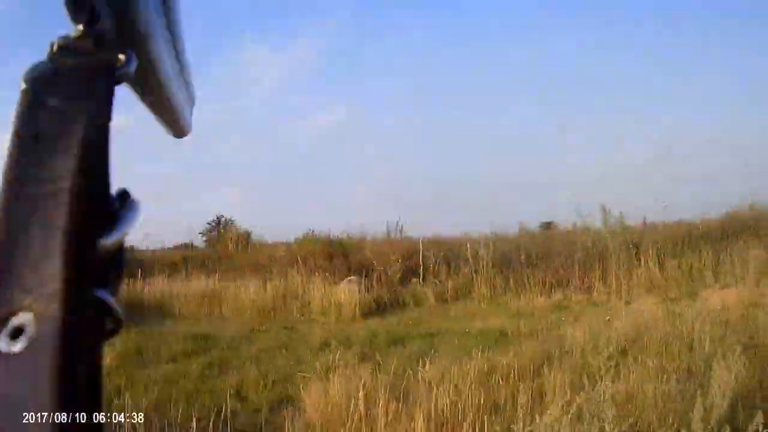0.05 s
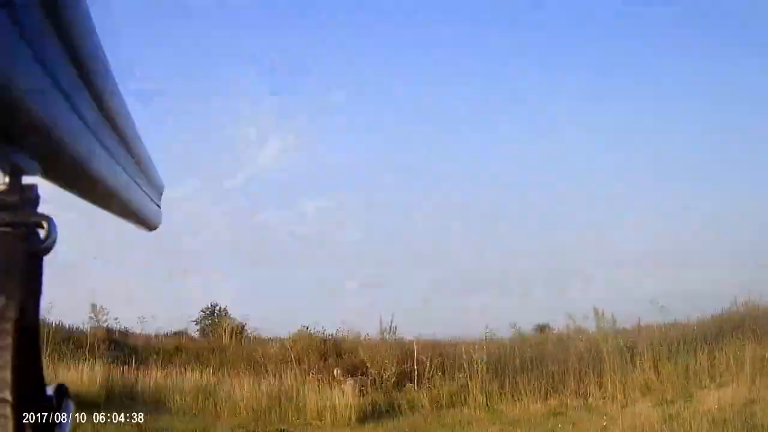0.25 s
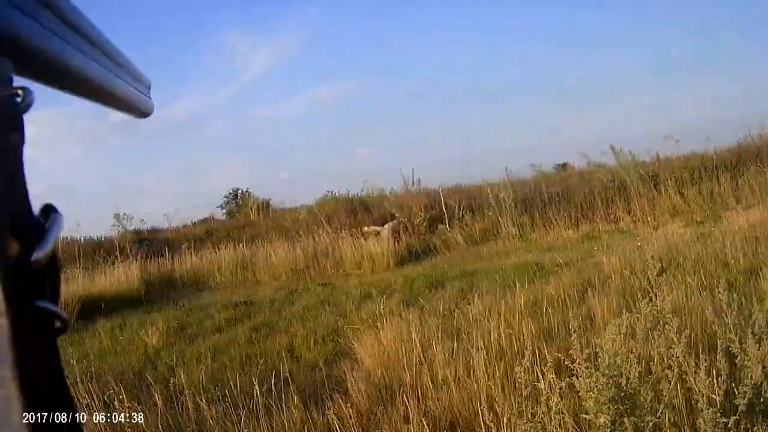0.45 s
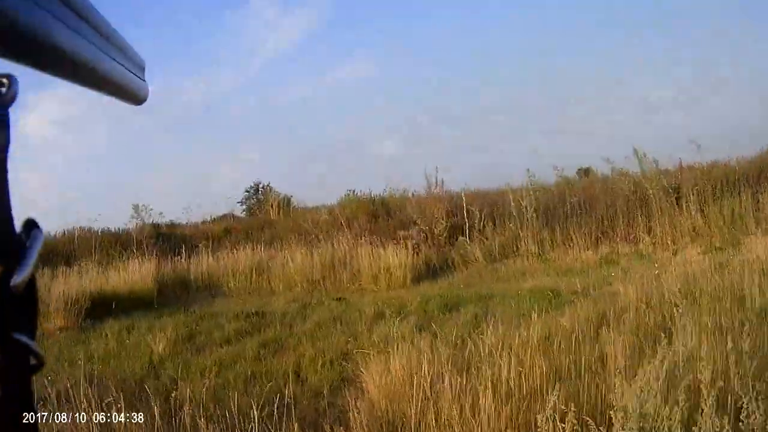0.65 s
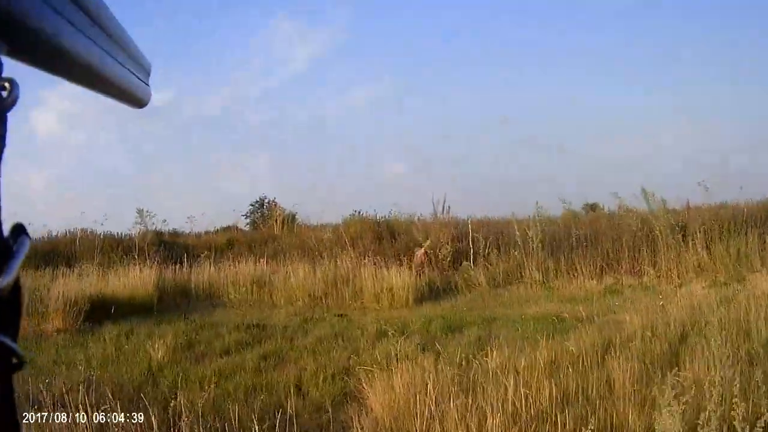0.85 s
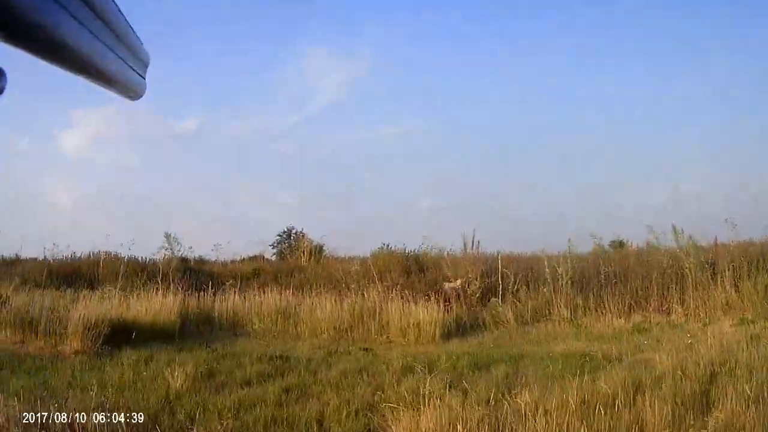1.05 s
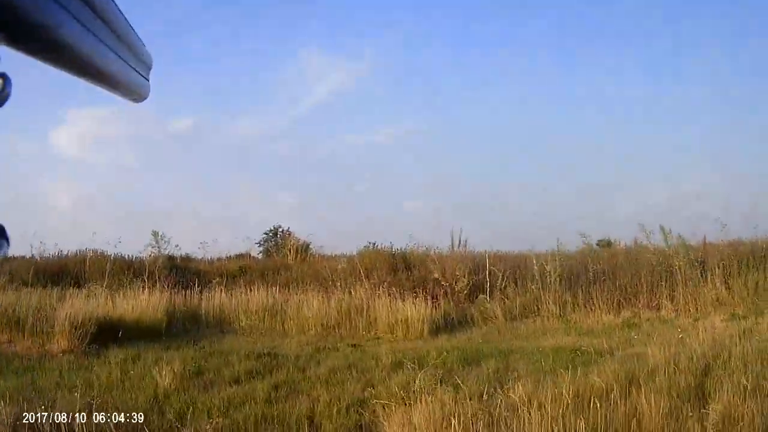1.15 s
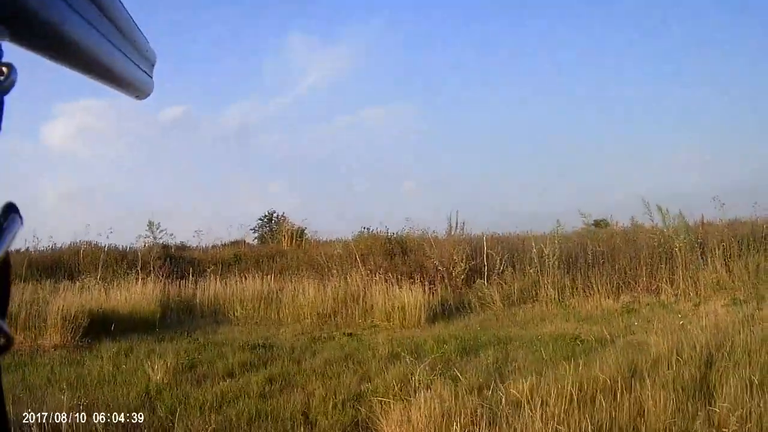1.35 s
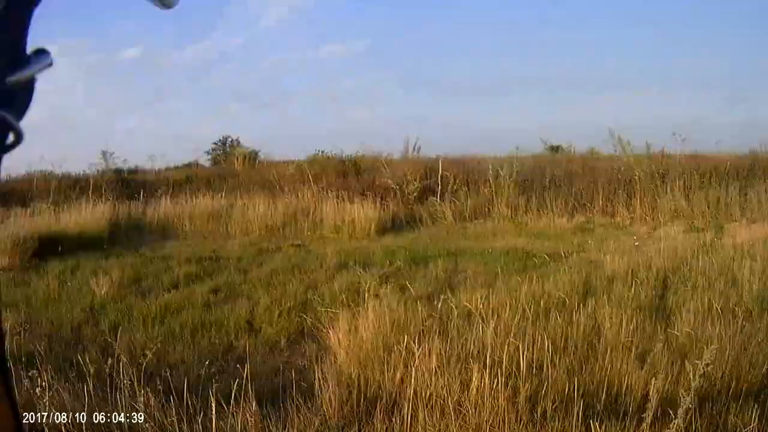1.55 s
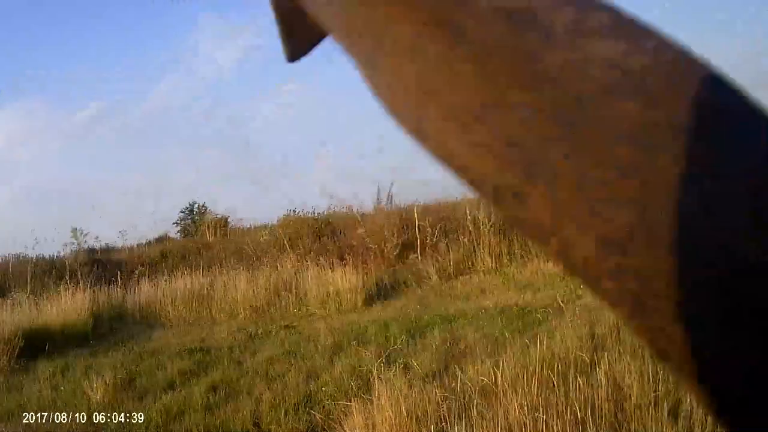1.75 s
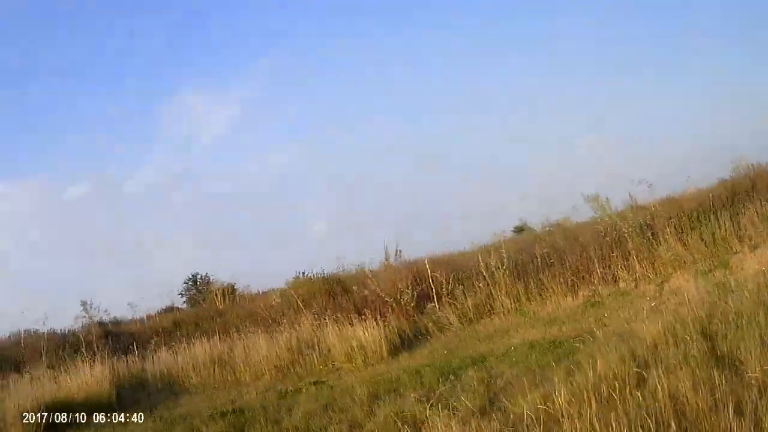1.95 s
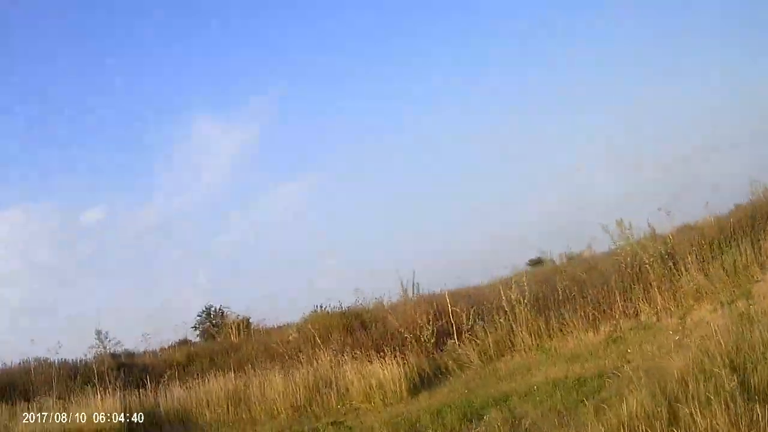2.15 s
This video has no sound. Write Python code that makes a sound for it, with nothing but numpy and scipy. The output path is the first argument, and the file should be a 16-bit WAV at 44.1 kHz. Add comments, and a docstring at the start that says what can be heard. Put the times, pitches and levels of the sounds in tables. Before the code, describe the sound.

Gear knocks and rubs against a body-worn microphone, with faint dry grass rustling outdoors.

```python
"""A faint brush of fabric, then gear knocks twice on the case of a body-worn camera as someone shifts
a gun in dry grass. Each impact excites the damped modes of the case. A sling and clothing slide over it
in short strokes of friction noise, catching and bumping. Stalks rustle and snap in light wind,
a sum of many tiny impulses, above a low rumble of moving air."""
import sys
import numpy as np
from scipy import signal
from scipy.fft import rfft, irfft, next_fast_len
from scipy.io import wavfile
from scipy.ndimage import map_coordinates

SR = 44100
rng = np.random.default_rng(int(sys.argv[2]) if len(sys.argv) > 2 else 0)


def generate_wav(sig):
    """Save sig (samples, or channels by samples) to the path in sys.argv[1] as 16-bit PCM at SR."""
    pcm = np.round(np.clip(np.atleast_2d(sig).T, -1, 1) * 32767).astype(np.int16)
    wavfile.write(sys.argv[1], SR, pcm)


N = 97020
T = np.arange(N) / SR
HIT_T = T[:SR // 10]  # time axis of one impact

# spectrum of far wind in the field: frequency_hz, gain_db
FAR_WIND_SPECTRUM = [(59, -44), (100, 0.5), (328, -3.5), (1330, 0.5), (2750, -11.5), (4870, -8),
                     (6840, -15), (10900, -18), (12900, -13.5), (16000, -32)]
# envelope of the rumble of air and movement: time_s, level_db
RUMBLE_ENVELOPE = [(0, -63.5), (.2, -78), (.25, -52), (.35, -64), (.44, -45), (.51, -62), (.6, -44.5),
                   (.68, -51.5), (.76, -70), (.95, -72), (1.07, -59.5), (1.2, -65.5), (1.46, -61),
                   (1.54, -50.5), (1.66, -54.5), (1.8, -53.5), (1.94, -64), (2.02, -72), (2.2, -60)]
# spectrum of that rumble: frequency_hz, gain_db
RUMBLE_SPECTRUM = [(15, 0.5), (35, -2.5), (70, -7), (150, -12), (280, -12.5), (500, -32), (1200, -64),
                   (4000, -90)]
# envelope of folding clothes: time_s, level_db
FOLD_ENVELOPE = [(.2, -97), (.28, -47), (.35, -67), (.44, -50.5), (.5, -71), (1.35, -74), (1.5, -50),
                 (1.55, -43.5), (1.62, -52.5), (1.76, -53), (1.88, -87), (1.94, -51), (2.0, -70)]
# spectrum of the muffled folds: frequency_hz, gain_db
FOLD_SPECTRUM = [(40, 5.5), (130, 2), (300, -3), (600, -10.5), (1200, -13.5), (4000, -30.5)]
# envelope of rustling grass: time_s, level_db
GRASS_ENVELOPE = [(0.7, -56.5), (0.74, -66), (0.754, -55.5), (0.764, -60.5), (0.908, -53), (0.958, -62),
                  (1.006, -55), (1.38, -72)]
# spectrum of stalks brushing together: frequency_hz, gain_db
BRUSH_SPECTRUM = [(120, -24), (300, -10.5), (850, -3.5), (1200, 5), (1550, 0.5), (2000, -7), (2800, -13.5),
                  (4200, -11.5), (5100, -13.5), (6800, -17), (10800, -23.5), (13200, -14), (16000, -29)]
# single stalks snapping: start_s, level_db, pitch_hz, ring_gain_db
STALK_SNAPS = [(0.0414, -30, 5940, -8), (0.904, -32, 5800, -7), (.935, -41, 7940, -8),
               (1.0353, -38, 5200, -4), (1.04, -39, 5000, 6), (1.063, -43, 5200, 3),
               (1.092, -39.5, 7900, -2), (1.131, -32.5, 5970, -10.5), (1.142, -33.5, 5000, -10),
               (1.205, -37, 12100, -4), (1.262, -37.5, 12400, -8.5), (1.459, -32.5, 10800, -12)]
# spectrum of a breaking stalk: frequency_hz, gain_db
SNAP_SPECTRUM = [(500, -5), (1400, -1), (2700, -13), (4000, -6.5), (5200, 4), (6600, -8), (8000, -4),
                 (10500, -11), (13000, -14), (16000, -32)]
# thin squeaks of fabric: start_s, level_db, t60_s
FABRIC_SQUEAKS = [(2.1677, -48, .03), (2.1766, -47, 0.069)]
# spectrum of a squeak: frequency_hz, gain_db
SQUEAK_SPECTRUM = [(11500, -34.5), (12700, -3), (13300, -5), (14100, -14), (15500, -24)]
# sliding strokes: start_s, length_s, level_db, change_db, tilt_db_per_octave, contact_hz, contact_db
SLIDING_STROKES = [(0, 0.041, -63.5, -2, 5, 6100, 9), (0.038, 0.066, -52.5, -3, 1.5, 6100, -1),
                   (0.1, 0.034, -46, 2.5, 2, 6230, 0.5), (0.157, 0.037, -54.5, -6, 2.5, 6000, 4),
                   (0.234, 0.074, -46.5, -7, -1, 4850, 6), (0.352, 0.019, -48, 8, 0.5, 3930, -5),
                   (0.3745, 0.064, -38.5, -7, 0.45, 426, 16.5), (.44, 0.031, -44.5, 1.5, -2.6, 3880, -1.5),
                   (0.603, 0.038, -47, 1, -0.2, 990, 13.5), (0.639, 0.054, -46, -15.5, -1.6, 3740, 2),
                   (1.397, 0.012, -54.5, 14, -4, 1870, 6), (1.499, 0.043, -48.5, 4, -0.7, 4800, 5),
                   (1.521, 0.037, -44, 1, -1, 8360, 6.5), (1.576, 0.024, -46.5, -9.5, -2, 835, 10),
                   (1.762, 0.014, -43, -11, -1.5, 1930, 12.5), (1.884, 0.025, -49.5, -3.5, -1.6, 2030, 9),
                   (1.961, 0.023, -50.5, -10, -0.5, 2040, 8), (2.004, 0.048, -53, -3, -2.2, 850, 11),
                   (2.102, 0.049, -48.5, -1.5, 0, 7400, 10.5), (2.148, 0.034, -55.5, 4.5, 0.5, 7000, 3)]
# spectrum of rubbing heard through the case: frequency_hz, gain_db
RUB_SPECTRUM = [(100, -2.5), (280, -10.5), (450, 5.5), (700, -2), (1000, 5), (1700, 0), (2150, 2),
                (2800, -7), (3400, 1.5), (3850, 6), (4300, -1.5), (4750, 4), (5400, -2.5), (6200, 0.5),
                (7300, -8.5), (8400, -3), (10500, -7), (13000, -13), (16000, -18)]
# low thumps on the case, from slips and under the second knock: release_s, level_db, loading_s
CASE_THUMPS = [(0.3149, -25, 0.00046), (0.475, -26, 0.00077), (0.5694, -25.5, 0.00043),
               (0.5736, -30.5, 0.0015), (0.5952, -21.5, 0.00076), (0.5999, -24.5, 0.0014),
               (0.6397, -17.5, 0.00042), (0.7507, -44.5, 0.00063), (1.075, -38, 0.0006),
               (1.205, -42.5, 0.0011), (1.533, -33.5, 0.0025), (1.54, -31.5, 0.0032),
               (1.689, -38.5, 0.0026), (1.949, -39.5, 0.0012)]
# soft pushes against the case: centre_s, level_db, half_width_s
SOFT_PUSHES = [(0.272, -34.5, 0.0034), (.545, -45, 0.032), (0.664, -32.5, 0.0081), (1.587, -39, 0.012),
               (1.619, -37.5, 0.011), (1.833, -39, 0.011)]
# light taps of the sling's hardware: start_s, level_db, pitch_hz, t60_s
HARDWARE_TAPS = [(.4020, -34, 970, 0.0072), (.4310, -19.5, 1420, 0.0033), (0.6384, -15, 936, 0.0078),
                 (0.6956, -42, 783, 0.045), (0.7507, -39.5, 943, 0.039), (1.4503, -27, 1270, 0.0072),
                 (1.458, -34.5, 1470, 0.0052), (1.5490, -26.5, 756, 0.012), (1.595, -39, 930, 0.021),
                 (1.808, -42.5, 1560, 0.006), (1.832, -43, 480, 0.016)]
# modes of a tap: pitch_ratio, gain_db
HARDWARE_MODES = [(.55, -3), (.83, 0), (1.18, 0), (1.5, -15.5)]
# modes of the case: frequency_hz, gain_db, t60_s
CASE_MODES = [(294, -27.5, 0.018), (441, 4, 0.029), (524, 1, 0.013), (791, -4.5, 0.028),
              (1044, -11.5, 0.022), (1117, -10.5, 0.015), (1236, -4.5, 0.018), (1430, 0, 0.018),
              (1740, -1.5, 0.0075), (2290, -9.5, 0.018), (3270, -13.5, 0.0076), (3770, -11.5, 0.011),
              (4300, -10.5, 0.0077), (6830, -13, 0.008)]
# spectrum of the crack at contact: frequency_hz, gain_db
CRACK_SPECTRUM = [(150, -35.5), (400, 5), (1000, 2), (2600, -15.5), (4000, 0), (5300, -12.5), (6500, -4),
                  (9500, -25.5), (13000, -25.5), (16000, -41)]
# knocks, tuned by the pressure on the case: start_s, level_db, corner_hz, mid_db, crack_db, pitch_ratio
GEAR_KNOCKS = [(0.2283, -3.5, 9050, 3, 0, 0.99), (0.2322, -4, 9000, -6, -6, 0.95),
               (0.316, -22.5, 1800, -9.5, -11, 1.13), (0.3772, -14.5, 6040, -20, -15, 0.95),
               (0.4407, -16.5, 4000, -28, -3.5, 0.85), (0.4584, -13.5, 2200, -12, -27, 1),
               (0.6376, -10.5, 7000, -18, 2, 1.04), (0.6452, -21, 6040, -8.5, -5, 1.11),
               (1.5587, -22.5, 1490, -7, -19, 0.996)]


def amp(db):
    """Amplitude ratio of a level in decibels."""
    return 10 ** (np.asarray(db) / 20)


def add(track, start_s, sound):
    """Superposition: a sound joins the track at start_s."""
    part = track[max(0, round(start_s * SR)):][:len(sound)]
    part += sound[:len(part)]


def coloured(x, spectrum, tilt=0, pivot_hz=4000):
    """Spectral shaping: x through a gain curve tilted in dB per octave, scaled to rms 1."""
    size = next_fast_len(len(x) + len(HIT_T))
    octave = np.log2(np.fft.rfftfreq(size, 1 / SR) + 1)
    hz, db = np.transpose(spectrum)
    tilt_db = tilt * (np.maximum(octave, np.log2(hz[0])) - np.log2(pivot_hz))
    gain = amp(np.interp(octave, np.log2(hz), db) + tilt_db)
    shaped = irfft(rfft(x, size) * gain, size)[:len(x)]
    return shaped / np.sqrt(np.mean(shaped ** 2) + 1e-20)


def grains(per_s, spread_db):
    """Shot noise: independent tiny impacts of uneven size."""
    impulses = (rng.random(N) < per_s / SR) * rng.choice([-1, 1], N)
    return impulses * amp(spread_db * np.clip(rng.standard_normal(N), -2, 2))


def wander(positions):
    """Smooth random variation: a spline through one Gaussian value per unit of position."""
    return map_coordinates(rng.standard_normal(size=200), [positions], mode="mirror")


def level(envelope, rest_db=-120):
    """Amplitude envelope, linear in decibels between points and at rest_db outside them."""
    return amp(np.interp(T, *np.transpose(envelope), left=rest_db, right=rest_db))


def decay(t60, rise_s=0.000082):
    """Damping: after a fast rise, the amplitude falls 60 dB in t60 seconds."""
    return np.exp(-np.log(1000) * HIT_T / t60) * (1 - np.exp(-HIT_T / rise_s))


def ring(hz, t60):
    """Free vibration of one damped mode."""
    return np.cos(2 * np.pi * hz * HIT_T) * decay(t60)


def burst(spectrum, t60, tilt=0):
    """A transient of coloured noise with exponential decay."""
    return coloured(rng.standard_normal(len(HIT_T)), spectrum, tilt) * decay(t60)


def case_highpass(x, cutoff_hz=240):
    """The response of the case falls away below its lowest mode."""
    return signal.sosfilt(signal.butter(2, cutoff_hz, "high", fs=SR, output="sos"), x)


def far_wind(level_db=-63):
    """Distant turbulence gives steady broadband noise."""
    return amp(level_db) * coloured(rng.standard_normal(N), FAR_WIND_SPECTRUM)


def rumble():
    """Air and movement at the microphone give slow pressure fluctuations."""
    return level(RUMBLE_ENVELOPE) * coloured(rng.standard_normal(N), RUMBLE_SPECTRUM)


def clothing(gain_db=-0.5):
    """Many small folds of cloth sum to muffled shot noise."""
    return amp(gain_db) * level(FOLD_ENVELOPE) * coloured(grains(per_s=1200, spread_db=4), FOLD_SPECTRUM)


def grass_rustle(gain_db=0.5, crackle_db=-9, swell_db=0.2, swells_per_s=52):
    """Dense impacts between stalks merge into a hiss; sparse ones are heard as crackle."""
    brush = coloured(grains(per_s=7000, spread_db=4), BRUSH_SPECTRUM)
    crackle = amp(crackle_db) * coloured(grains(per_s=170, spread_db=3), SNAP_SPECTRUM)
    swell = amp(gain_db + swell_db * wander(T * swells_per_s))
    return swell * level(GRASS_ENVELOPE, rest_db=-65) * (brush + crackle)


def stalk_snaps(neutral_hz=5450):
    """Fracture releases a crack of noise and leaves the stalk ringing briefly."""
    out = np.zeros(N)
    for start_s, db, hz, ring_db in STALK_SNAPS:
        tilt = 6 * np.log2(hz / neutral_hz)  # higher stalks crack brighter
        crack = burst(SNAP_SPECTRUM, t60=0.0069, tilt=tilt)
        add(out, start_s, .5 * amp(db) * (.5 * crack + amp(ring_db) * ring(hz, t60=0.01)))
    return out


def fabric_squeaks():
    """Friction catches the fabric twice in the last stroke: narrow-band noise, a thin whistle."""
    out = np.zeros(N)
    for start_s, db, t60 in FABRIC_SQUEAKS:
        add(out, start_s, amp(db) * burst(SQUEAK_SPECTRUM, t60))
    return out


def contact_colour(x, ripple_db=1.47, spacing_hz=344):
    """Each place of contact has its own transfer function, with random peaks and dips."""
    hz = np.fft.rfftfreq(len(x), 1 / SR)
    return irfft(rfft(x) * amp(ripple_db * wander(hz / spacing_hz)), len(x))


def rubbing(slips_per_s=20000, rasp_db=1.77, rasp_per_s=230, attack_s=0.005, release_s=0.0086):
    """Sliding friction: fibre slips under an uneven grip drive a contact resonance and the case."""
    out = np.zeros(N)
    for start_s, length_s, db, change_db, tilt, contact_hz, contact_db in SLIDING_STROKES:
        t = T[:int((length_s + .1) * SR)]
        envelope = (1 - np.exp(-t / attack_s)) * np.exp(-np.maximum(t - length_s, 0) / release_s)
        grip_db = rasp_db * wander(t * rasp_per_s)
        ramp_db = change_db * (np.minimum(t / length_s, 1) - .5)
        slips = ((rng.random(N) < slips_per_s / SR) * rng.standard_normal(N))[:len(t)]
        resonance = signal.lfilter(*signal.iirpeak(contact_hz, Q=10.5, fs=SR), slips)
        contact = contact_colour(slips + (amp(contact_db) - 1) * resonance)
        friction = coloured(contact, RUB_SPECTRUM, tilt)
        add(out, start_s, amp(db + grip_db + ramp_db) * envelope * friction)
    return out


def case_thumps(cutoff_hz=840):
    """A load that builds on the case and drops at once gives a low thump; slow pushes give duller ones."""
    load = sum(amp(db) * np.exp(-abs(T - release_s) / loading_s) * (T < release_s)
               for release_s, db, loading_s in CASE_THUMPS)
    pushes = np.zeros(N)
    for centre_s, db, half_width_s in SOFT_PUSHES:
        offset = (T - centre_s) / half_width_s
        pushes += amp(db) * (1 - offset ** 2) * np.exp(-.5 * offset ** 2)
    return pushes - signal.sosfilt(signal.butter(2, cutoff_hz, fs=SR, output="sos"), load)


def hardware_taps():
    """Light impacts of the sling's hardware excite a few inharmonic modes."""
    out = np.zeros(N)
    for start_s, db, hz, t60 in HARDWARE_TAPS:
        modes = sum((-1) ** k * amp(mode_db) * ring(hz * ratio, t60)
                    for k, (ratio, mode_db) in enumerate(HARDWARE_MODES))
        add(out, start_s, amp(db) * modes)
    return case_highpass(out)


def gear_knocks(mid_hz=1410, scatter_db=1.0):
    """Impact excites the modes of the case; a softer contact rings only the low ones."""
    out = np.zeros(N)
    for start_s, db, corner_hz, mid_db, crack_db, pitch_ratio in GEAR_KNOCKS:
        body = np.zeros(len(HIT_T))
        for k, (hz, mode_db, t60) in enumerate(CASE_MODES):
            mid_gain = amp(mid_db * np.exp(-np.log2(hz / mid_hz) ** 2))
            contact_lowpass = 1 / np.hypot(1, (hz / corner_hz) ** 2)
            gain = amp(mode_db + rng.normal(0, scatter_db)) * mid_gain * contact_lowpass
            body += (-1) ** k * gain * ring(hz * pitch_ratio, t60)
        crack = amp(crack_db) * burst(CRACK_SPECTRUM, t60=0.01)
        add(out, start_s, .5 * amp(db) * (case_highpass(body) + crack))
    return case_highpass(out)


def scene():
    """Free field: the close sources add in one channel, without reflections."""
    handling = gear_knocks() + hardware_taps() + case_thumps() + rubbing() + fabric_squeaks()
    background = grass_rustle() + stalk_snaps() + rumble() + clothing() + far_wind()
    return (handling + background)[None]


def record(dry):
    """Band limiting: the camera cuts off steeply above 16.1 kHz."""
    return signal.sosfilt(signal.ellip(10, .1, 90, 16100, fs=SR, output="sos"), dry)


dry = scene()
out = record(dry)
generate_wav(out)
```